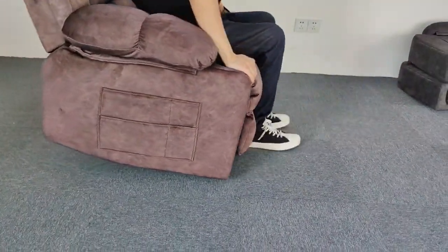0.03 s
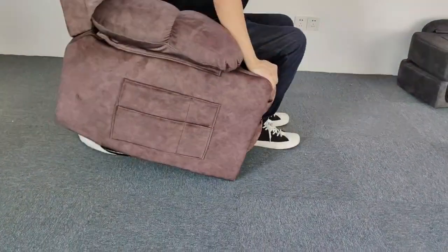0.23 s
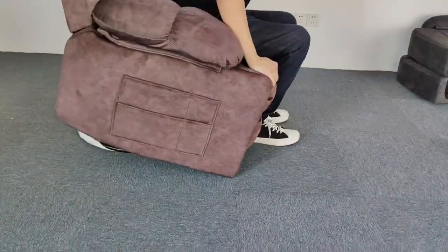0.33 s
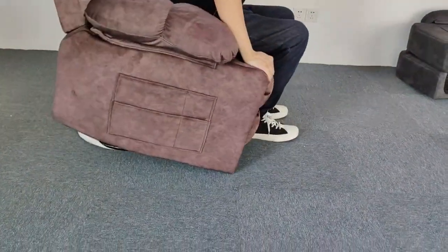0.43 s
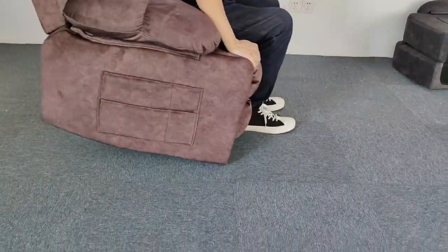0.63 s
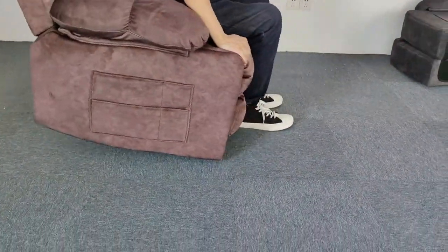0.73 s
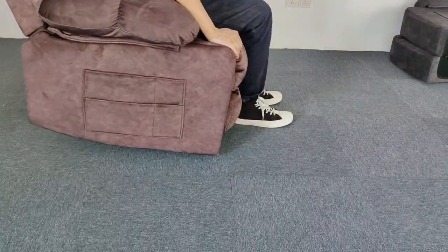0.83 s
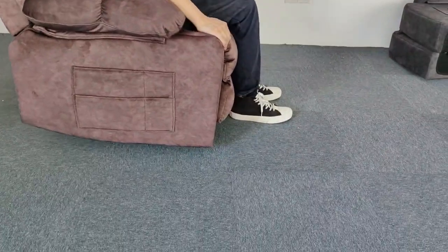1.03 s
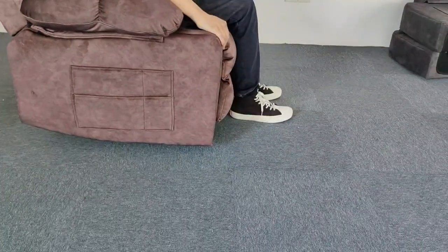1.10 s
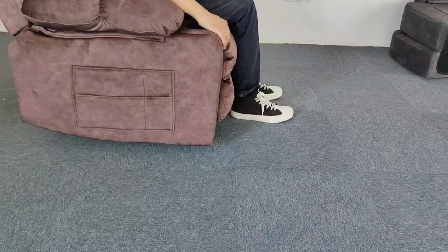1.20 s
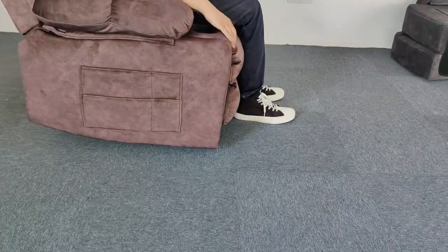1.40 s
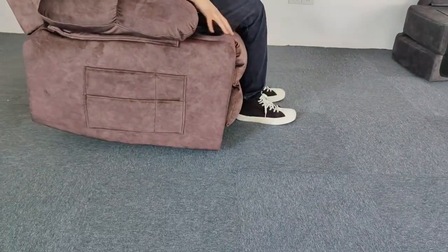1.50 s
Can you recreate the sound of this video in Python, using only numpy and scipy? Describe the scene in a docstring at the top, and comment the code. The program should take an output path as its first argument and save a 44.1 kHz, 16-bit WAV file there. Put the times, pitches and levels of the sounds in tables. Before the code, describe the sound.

In a quiet carpeted room, a recliner's footrest closes with a single sharp metal clack and woody knock. A short echo follows, then soft rocking and a trace of sliding upholstery over low room tone.

```python
"""A faint stir of cushions, then one clack: a recliner's footrest folds shut in a quiet, carpeted room.
The catch scrapes, the steel linkage snaps and rattles for a moment and knocks the wooden frame,
and the bare walls answer. The chair settles with a low rumble as it rocks and a trace of hiss
as its upholstery slides, over a low room tone with a faint whine."""
import sys
import numpy as np
from scipy import signal
from scipy.fft import irfft
from scipy.io import wavfile

SR = 44100
rng = np.random.default_rng(int(sys.argv[2]) if len(sys.argv) > 2 else 0)


def dump_mix(stems):
    """Bounce the given channels to the path in sys.argv[1] as a 16-bit WAV at rate SR."""
    frames = np.atleast_2d(stems).T  # one column per channel
    limited = np.clip(frames, -1, 1)  # hard clip at full scale
    pcm = np.round(limited * 32767).astype(np.int16)
    wavfile.write(sys.argv[1], SR, pcm)


N = 68355
T = np.arange(N) / SR

# the catch scraping just before the snap: (time [s], length [s], level [dB])
CATCH_SCRAPES = [(.2065, 0.0071, -43), (.2138, 0.0024, -32)]
# steel-on-steel hits: (time [s], level [dB], brightness tilt [dB/octave], crack t60 [s])
STEEL_HITS = [(.2159, -21.5, -3, 0.011), (.2170, -17.5, 1, .009), (0.2181, -26.5, -1, .011),
              (0.2259, -39, -1, 0.0068), (0.2292, -21, -2.5, 0.018), (0.2318, -22, -0.5, 0.022),
              (0.2355, -25, -0.5, 0.011)]
# tone colour of steel contact: (frequency [Hz], relative level [dB])
STEEL_COLOUR = [(60, -26.5), (500, -7), (1200, -9.5), (1900, -15.5), (3300, -5), (4300, -18), (5700, -0.5),
                (7000, -3.5), (7900, -5.5), (9800, -6.5), (12000, -2), (12800, -21), (14000, -10.5)]
# ring of the links: (frequency [Hz], relative level [dB], t60 [s])
LINK_MODES = [(3234, -10, 0.017), (3638, -15, 0.011), (5540, -13, .03), (5890, -17, .04),
              (6900, -6.5, 0.016), (8060, -15, .025), (9710, -15.5, .04), (11500, -13, .02)]


def linkage():
    """The catch scrapes, then each steel hit cracks and sets the links ringing: (cracks, rings)."""
    cracks = noise(STEEL_COLOUR) * swells(CATCH_SCRAPES)
    rings = np.zeros(N)
    for start, level_db, tilt_db, crack_t60 in STEEL_HITS:
        strike = amp(level_db) * attack(seconds=0.0006)
        # each hit loads the links a little differently
        detunes = 1 + 0.016 * rng.uniform(-1.079, 1, len(LINK_MODES))
        ring = sum(mode(hz * detune, db, t60) for (hz, db, t60), detune in zip(LINK_MODES, detunes))
        add(cracks, start, strike * noise(STEEL_COLOUR, tilt_db) * fade(crack_t60))
        add(rings, start, strike * ring)
    return cracks, rings


# knocks on the frame: (time [s], level [dB], centre of the modes reached [Hz], spread [octaves])
FRAME_KNOCKS = [(0.2171, -28, 560, 2.4), (.2217, -15, 330, 0.5), (.2272, -25.5, 838, 0.19),
                (0.2341, -24.5, 520, 0.97), (0.2453, -22, 135, 0.45)]
# woody body of the clack: (frequency [Hz], relative level [dB], t60 [s])
FRAME_MODES = [(139, -5.5, 0.1404), (180.5, 0, .07), (211, -4, 0.16), (247.8, -8.5, 0.21),
               (274.3, -2.5, 0.18), (395.7, -13, .11), (451.8, -5, 0.1013), (652.7, -9.5, 0.12),
               (827, 5.5, 0.066), (912, -6.5, .06), (1040, -15.5, .07), (1240, -15.5, 0.051)]
# dull crunch of the padded frame: (frequency [Hz], relative level [dB])
CRUNCH_COLOUR = [(40, -45), (120, -17), (260, -6.5), (500, 0.5), (950, -0.5), (1500, -18), (3000, -24),
                 (8000, -65.5)]


def wooden_frame():
    """Each knock lands on another part of the frame and favours its own range of modes."""
    out = np.zeros(N)
    for start, level_db, centre_hz, octaves in FRAME_KNOCKS:
        strike = amp(level_db) * attack(seconds=0.0029)
        body = sum(mode(hz, db, t60) / (1 + (np.log2(hz / centre_hz) / octaves) ** 2)
                   for hz, db, t60 in FRAME_MODES)
        crunch = amp(-13) * noise(CRUNCH_COLOUR) * fade(t60=0.091)
        add(out, start, strike * (body + crunch))
    low_cut = signal.butter(2, 70.1, "highpass", fs=SR, output="sos")  # the knocks carry little below 70 Hz
    return signal.sosfilt(low_cut, out)


# reverb tail: (frequency [Hz], level [dB], t60 [s], build-up [s])
REVERB_BANDS = [(60, -7.5, 1, 0.03425), (150, -1.5, .62, .08), (290, -1, 0.65, 0.053),
                (500, -2, 0.57, 0.025), (820, -5, .6, 0.037), (1500, -2, 0.63, 0.0076),
                (3200, -5, 0.39, .012), (4600, -4, 0.38, 0.004), (5800, -3.5, .44, .012),
                (7330, -10.5, 0.43, .012), (9800, -8.5, 0.35, 0.014), (13000, -8, 0.39, 0.014)]
# slaps off the far walls: (delay [s], level [dB])
WALL_ECHOES = [(.092, -8), (0.109, -18), (0.155, -19)]


def room_reverb(send):
    """The walls return a diffuse tail, slow in the bass and short in the treble, and dull echoes."""
    hz, t, grains = signal.stft(rng.choice([-1., 1.], N), SR, nperseg=512)
    gain = amp(read(REVERB_BANDS, hz))[:, None]
    t60 = read(REVERB_BANDS, hz, column=2)[:, None]
    build_up = read(REVERB_BANDS, hz, column=3)[:, None]
    envelope = np.minimum(t / build_up, 1) * fade(t60, t)
    energy_trim = np.sqrt(2 * np.log(1000) / (t60 * SR))  # offsets the energy of a longer decay
    tail = signal.istft(grains * envelope * energy_trim * gain, SR, nperseg=512)[1][:N]
    out = np.zeros(N)
    add(out, 0.0087, signal.fftconvolve(send, tail))  # pre-delay
    dull = signal.sosfilt(signal.butter(2, 565, "lowpass", fs=SR, output="sos"), send)
    for delay, db in WALL_ECHOES:
        add(out, delay, amp(db) * dull)
    return out


# the chair's moves, the cushions' as the footrest swings in: (time [s], length [s], level [dB])
CHAIR_ROCKS = [(.03, 0.13, -50), (.54, 0.12, -49.5), (1.07, 0.032, -46.5), (1.18, 0.18, -48.5),
               (1.46, 0.043, -44)]
CUSHION_SHIFTS = [(-0.11, 0.22, -54.5)]
FABRIC_SLIDES = [(.55, .65, -73.5)]
# their deep rumble, muffled rustle and thin hiss: (frequency [Hz], relative level [dB])
RUMBLE_COLOUR = [(20, -51), (50, -12), (75, 12), (110, -19.5), (260, -18), (500, -37), (1500, -47),
                 (6000, -68)]
CUSHION_COLOUR = [(60, -5), (200, -4.5), (330, 1), (500, -11), (1200, -35), (6000, -50)]
FABRIC_COLOUR = [(200, -52), (8000, -68), (11300, -22.5), (12500, -12.5), (14000, -15)]


def chair_movement():
    """The chair rocks on the carpet, its cushions shift and its cover slides."""
    rumble = noise(RUMBLE_COLOUR) * swells(CHAIR_ROCKS)
    rustle = noise(CUSHION_COLOUR) * swells(CUSHION_SHIFTS)
    hiss = noise(FABRIC_COLOUR) * swells(FABRIC_SLIDES)
    return rumble + rustle + hiss


# bed of room air: (frequency [Hz], relative level [dB])
AIR_COLOUR = [(15, -41.5), (25, -7.5), (81, 1), (156, -11), (235, -11), (281, -20), (327, -19.5),
              (979, -29), (1200, -34.5), (1360, -32), (2780, -36.5), (3000, -34.5), (3240, -39),
              (4630, -35.5), (11000, -55.5), (14300, -82), (22000, -120)]
# thin whines above it: (frequency [Hz], level [dB])
WHINES = [(1405, -81.5), (2580, -82.5), (3036, -80.5), (4097, -87.5), (4590, -82.5)]


def room_tone():
    """Low steady air with a few faint, fuzzy whines that waver in level."""
    out = amp(-54.5) * noise(AIR_COLOUR)
    for hz, db in WHINES:
        fuzz = drift(hz=28)
        waver = amp(2 * drift(hz=3))
        out += amp(db) * unit(fuzz * waver * np.sin(2 * np.pi * hz * T))
    return out


def amp(db):
    """Decibels to gain."""
    return 10 ** (np.asarray(db) / 20)


def unit(x):
    """Scales to rms 1."""
    return x / np.sqrt(np.mean(x ** 2) + 1e-20)


def read(table, hz, column=1):
    """Reads one column of a table along log frequency."""
    rows = np.array(table)
    return np.interp(np.log(hz + 1), np.log(rows[:, 0] + 1), rows[:, column])


def add(mix, start, sound):
    """Mixes a sound in at a start time in seconds."""
    part = mix[max(round(start * SR), 0):][:len(sound)]
    part += sound[:len(part)]


def noise(colour, tilt_db=0):
    """Noise of rms 1 with a given spectrum, tilted per octave."""
    hz = np.fft.rfftfreq(N, 1 / SR)
    phase = np.exp(2j * np.pi * rng.random(len(hz)))
    spectrum_db = read(colour, hz) + tilt_db * np.log2(hz + 20)
    return unit(irfft(phase * amp(spectrum_db), N))


def drift(hz):
    """Random modulation of rms 1 that rolls off above a given rate."""
    return noise([(0, 0), (hz, 0), (2 * hz, -20), (10 * hz, -100)])


def attack(seconds):
    """Linear ramp up to full level."""
    return np.minimum(T / seconds, 1)


def fade(t60, t=T):
    """Exponential decay by 60 dB in t60 seconds."""
    return np.exp(-np.log(1000) * t / t60)


def mode(hz, db, t60):
    """One struck resonance: a decaying sine."""
    return amp(db) * fade(t60) * np.sin(2 * np.pi * hz * T)


def swells(rows):
    """One smooth rise and fall for each row."""
    return sum(amp(db) * np.sin(np.pi * np.clip((T - start) / length, 0, 1))
               for start, length, db in rows)


def scene():
    """The clack and its reverb over the quiet background, in mono."""
    cracks, rings = linkage()
    clack = cracks + wooden_frame()
    reverb = room_reverb(clack + amp(-10.5) * rings)  # less of the links' ring reaches the room
    return (clack + rings + reverb + chair_movement() + room_tone())[None]


def record(dry):
    """A steep high cut takes off the very top."""
    high_cut = signal.firwin(511, 14150, window=("kaiser", 9), fs=SR)
    return signal.oaconvolve(dry, high_cut[None], "same")


dry = scene()
out = record(dry)
dump_mix(out)
```